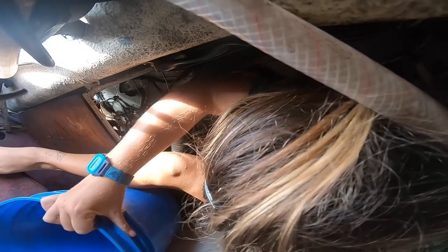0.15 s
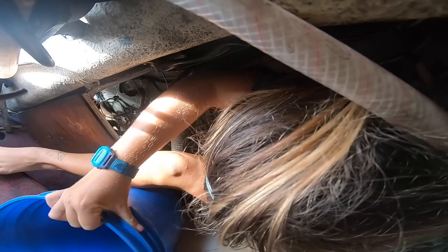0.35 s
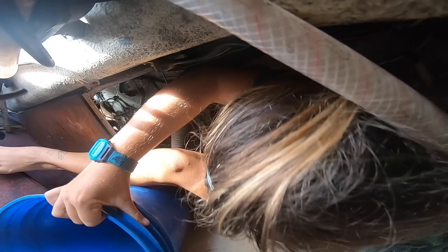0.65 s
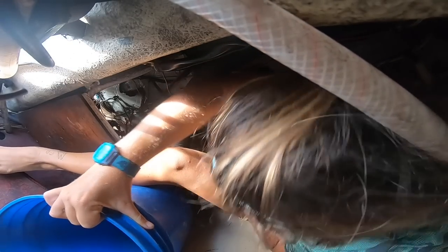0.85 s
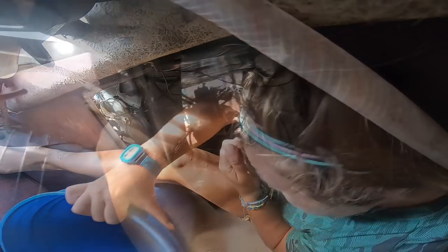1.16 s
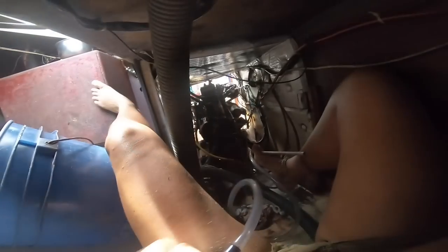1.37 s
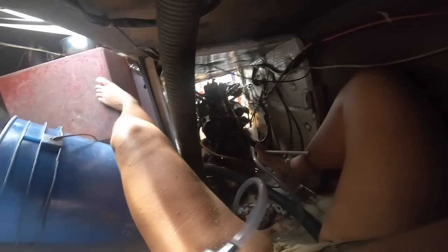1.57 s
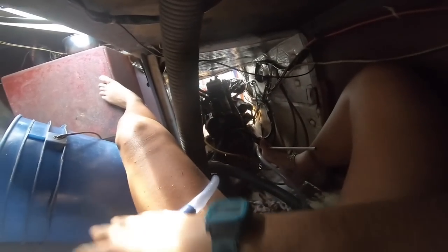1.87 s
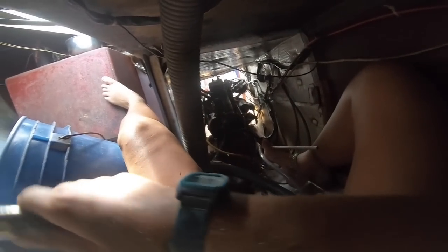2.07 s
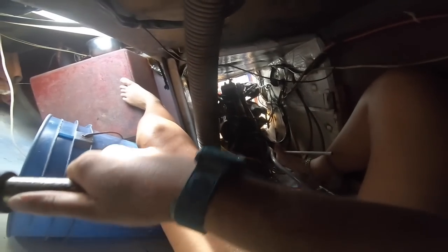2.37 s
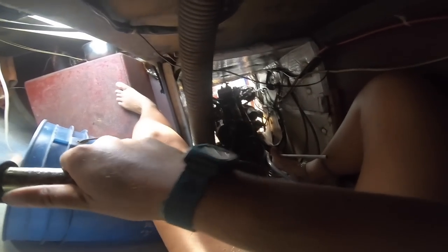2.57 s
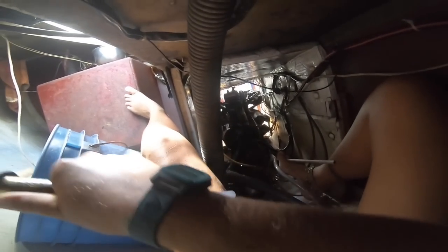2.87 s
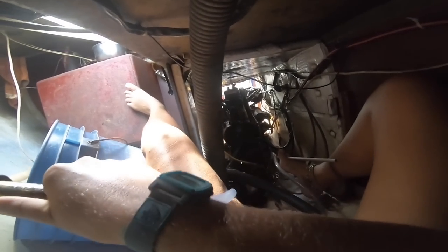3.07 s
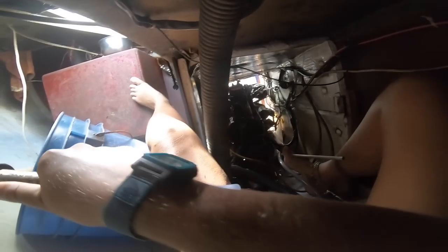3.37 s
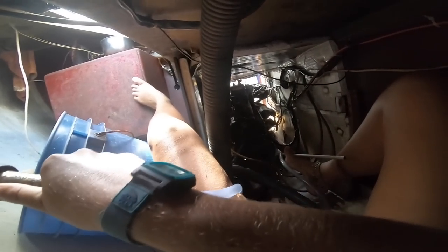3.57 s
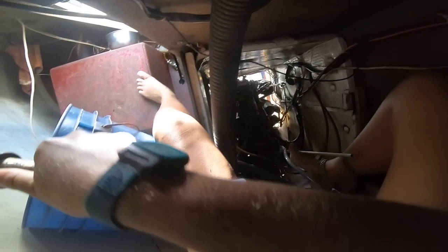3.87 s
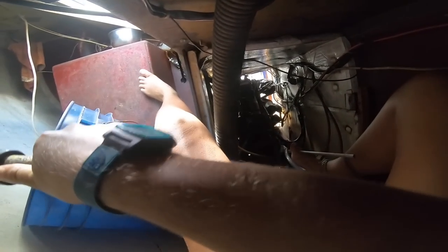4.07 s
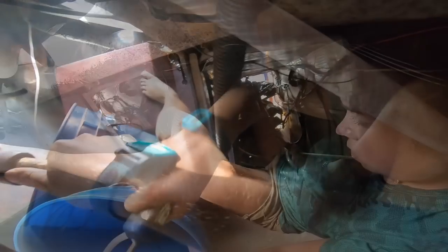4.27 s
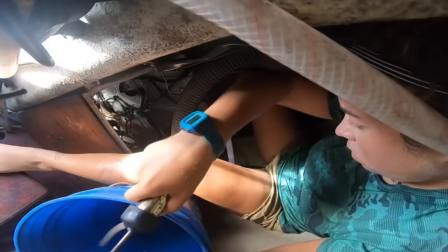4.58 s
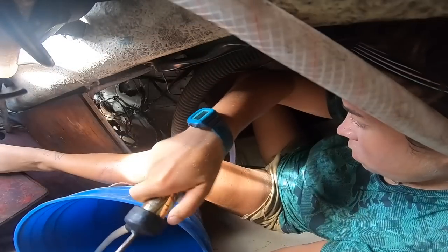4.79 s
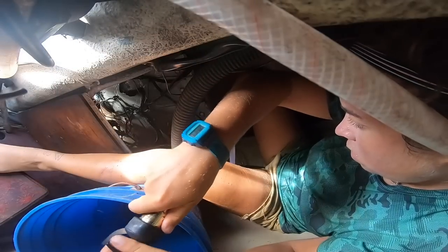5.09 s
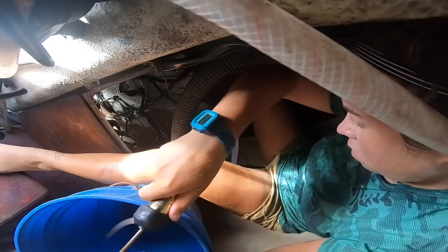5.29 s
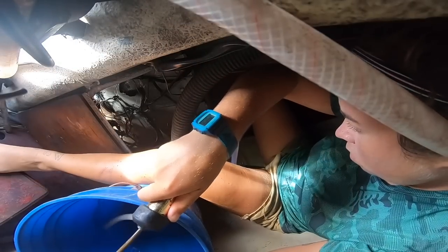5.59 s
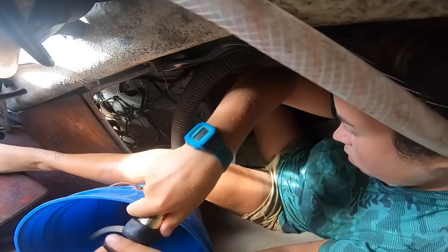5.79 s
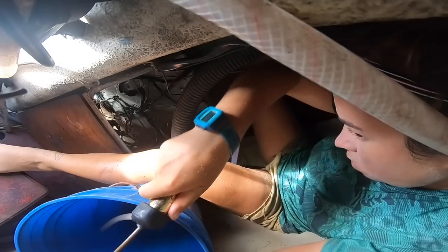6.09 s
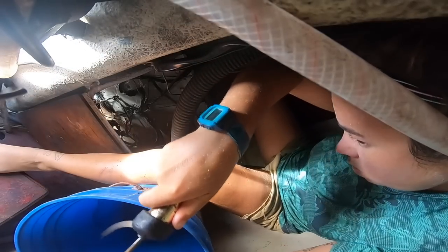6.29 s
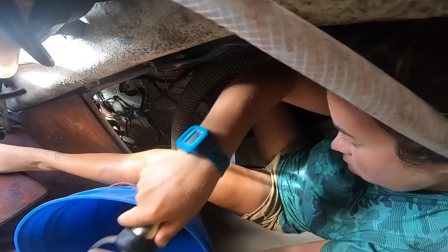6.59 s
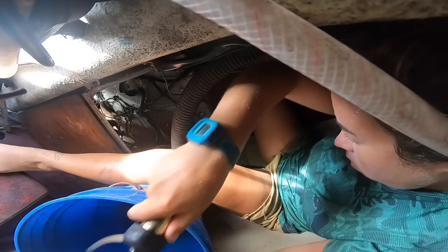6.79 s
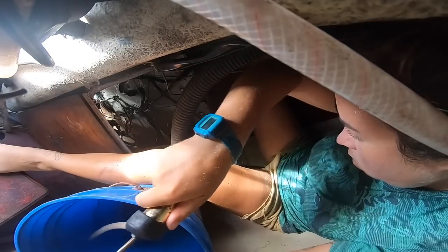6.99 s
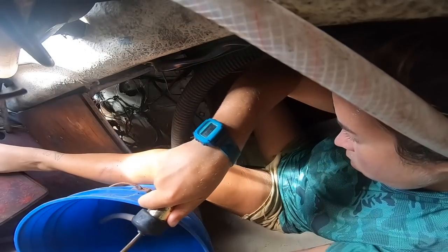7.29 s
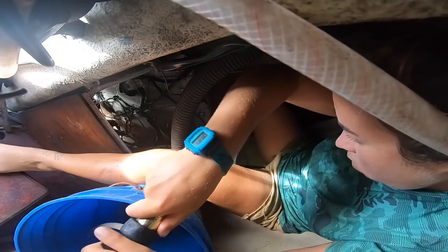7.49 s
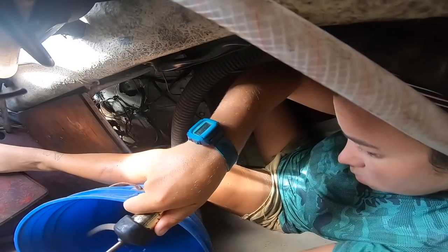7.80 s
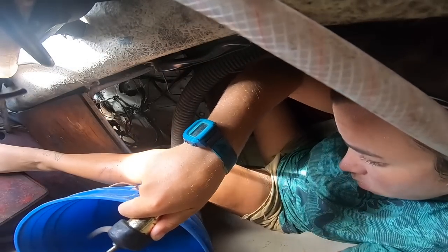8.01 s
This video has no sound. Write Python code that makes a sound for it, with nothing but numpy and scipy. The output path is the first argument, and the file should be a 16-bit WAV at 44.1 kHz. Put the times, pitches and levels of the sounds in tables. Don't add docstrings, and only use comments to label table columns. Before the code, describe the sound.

From 0 to about 1.2 seconds, low lumpy hand rumble leans to one side, with faint water slosh, small taps on a bucket rim and two very thin high whines that then drop away. From 1.3 to 4.2 it is drier and quiet: rumble continues, a very faint rub passes near 1.8, and a pump knocks the hollow plastic bucket around 2.3 and 2.9, with small clicks near 3.4 and 4.2. At about 4.3 water bursts in, far louder: a cluster of splats and squelching air until 4.7, sparser hits near 5 and 5.2, then dense irregular spurts from 5.5 to 8. Deep drumming thuds, crackling spray, brief plastic ringing, rising bubble plops and gurgles overlap, especially strong near 5.9, 6.6, 6.8 and 7.4. Running water swells between blows, with short close-wall reflections.

```python
import sys
import numpy as np
from scipy import signal
from scipy.fft import rfft, irfft, next_fast_len
from scipy.io import wavfile
from scipy.ndimage import uniform_filter1d

SR = 44100
rng = np.random.default_rng(int(sys.argv[2]) if len(sys.argv) > 2 else 0)


def ratio_of_db(decibels):
    return 10 ** (np.asarray(decibels, float) / 20)


def wrap_up_sound(samples):
    columns = np.atleast_2d(samples).T
    tamed = np.clip(columns, -1, 1)
    steps = np.round(tamed * 32767).astype(np.int16)
    wavfile.write(sys.argv[1], SR, steps)


N = 359360
TIME = np.arange(N) / SR
LEFT_RIGHT = np.array([[1], [-1]])

# start_s,
# peak_db, deep_share_db, length_s
SLUGS = [(0.225, -33.5, 4, 0.071), (0.951, -28.5, 2.5, 0.029), (4.351, -12, -17.5, 0.036),
         (4.46, -21.5, -25, 0.032), (4.552, -5.5, -10, 0.012), (4.652, -15, -1.5, 0.035),
         (4.979, -13, -24, 0.0076), (5.224, -15, 0.5, 0.031), (5.418, -25, 1, 0.069),
         (5.53, -13, -5, 0.0066), (5.595, -10.5, -9, 0.049), (5.651, -8, -6, 0.03),
         (5.748, -1, -14.5, 0.0062), (5.9, -13, -24.5, 0.01), (5.938, 2, -21.5, 0.017),
         (6.042, -12.5, -3, 0.12), (6.428, -20.5, -10, 0.0084), (6.498, -6, -8, 0.044),
         (6.551, -7, -8, 0.018), (6.608, -10.5, -16, 0.018), (6.74, -15.5, -14, 0.014),
         (6.787, -7, -7, 0.0075), (6.835, -18, -4.5, 0.016), (6.913, -11, -31, 0.007),
         (7.049, -22.5, -28, 0.031), (7.367, -6, -4.5, 0.04), (7.398, -1.5, -10.5, 0.011),
         (7.499, -8, -36, 0.0076), (7.543, -21, -33.5, 0.0087), (7.563, -17, -16, 0.0081),
         (7.606, -16.5, -20, 0.0077), (7.643, -17, -13, 0.016), (7.704, -9, -8, 0.03),
         (7.798, -14.5, -5.5, 0.032), (8.013, -35, 9, 0.041)]
# pitch_hz, width_hz, level_db
COLUMN_MODES = [(153.4, 11.5, 1.5), (172.4, 22.3, -0.5)]
# pitch_hz, width_hz, level_db
FLOOR_MODES = [(246, 84.3, -3), (276, 22.9, 4), (332.7, 12.7, -12)]
# start_s, spray_peak_db, share_above_5500_hz_db, t60_s, rise_s
SPLATS = [(4.331, -31, -25, 0.27, 0.0014), (4.349, -11.5, -13.5, 0.13, 0.0038),
          (4.465, -40, -40, 0.082, .002), (4.552, -11.5, -8, 0.15, 0.0046),
          (4.659, -25.5, -5, 0.31, 0.0064), (4.978, -11, 2, 0.1, 0.00091), (5.233, -27, -14, 0.4, 0.0018),
          (5.418, -31, 1, 0.31, 0.016), (5.549, -20.5, -36, 0.14, 0.0024), (5.612, -21, -27, 0.14, 0.0036),
          (5.645, -25, 0, 0.43, 0.012), (5.785, -10.5, -1.5, 0.085, 0.0028), (5.937, -10, -7, 0.11, 0.0069),
          (6.064, -14.5, -20, 0.17, 0.0068), (6.135, -28, -28, 0.22, 0.0073),
          (6.431, -39.5, 8.5, 0.079, 0.0015), (6.48, -26, -5.5, 0.3, 0.033),
          (6.598, -6, -19, 0.092, 0.0035), (6.676, -21, -27, 0.07, 0.0023), (6.786, -9, -11, 0.13, 0.002),
          (6.885, -30.5, -28, 0.25, 0.0066), (6.948, -18.5, -23, 0.29, 0.0022),
          (6.998, -30.5, -1, 0.61, 0.0041), (7.11, -26, -7.5, 0.099, 0.01), (7.372, -21, -13, 0.27, 0.006),
          (7.475, -15.5, -12.5, 0.096, 0.002), (7.638, -26.5, -26, 0.25, 0.0036),
          (7.706, -28.5, -29, 0.49, 0.033), (7.805, -21.5, -17, 0.13, 0.0022),
          (8.02, -20.5, -3.5, 0.24, 0.0036), (8.123, -20, -10, 0.058, 0.0018)]
# pitch_hz, level_db, t60_s
RIM_MODES = [(2165, -5, 0.07), (2840, -4.5, 0.052), (3060, -6, 0.057), (3450, -1.5, 0.11),
             (3524, -3, 0.094), (3960, -21, 0.068), (4700, -8, 0.05), (7760, -5, 0.054)]
# pitch_hz, level_db (per Hz)
SPRAY_COLOUR = [(1500, 5.5), (2200, -1), (3500, 4), (5200, -5), (7600, 4), (10000, -3), (12500, -28),
                (15800, -44)]
# start_s, peak_db, bubble_pitch_hz, t60_s
PLOPS = [(4.336, -30.5, 615, 0.1), (4.349, -18.5, 601, 0.25), (4.466, -22.5, 1410, 0.075),
         (4.559, -14.5, 912.6, 0.14), (4.663, -20, 1065, 0.1), (4.815, -27.5, 664, 0.52),
         (4.977, -23, 1420, 0.11), (5.186, -30, 1412, 0.0596), (5.228, -26.5, 1379, 0.27),
         (5.427, -23.5, 1035, 0.13), (5.617, -25.5, 1145, 0.258), (5.655, -17.5, 945, 0.2),
         (5.739, -25, 1371, 0.4), (5.792, -18, 896, 0.0626), (5.945, -11.5, 1027, 0.14),
         (6.048, -17, 1032, 0.6), (6.147, -20.5, 1038, 0.15), (6.315, -27, 640, 0.119),
         (6.431, -23.5, 628, 0.27), (6.507, -26.5, 1327, 0.31), (6.598, -23, 974, 0.1962),
         (6.785, -12, 610, 0.15), (6.918, -17, 1020, 0.19), (7.121, -23.5, 587, 0.1102),
         (7.209, -29, 1420, 0.1048), (7.38, -20.5, 972, 0.1452), (7.4, -17, 860, 0.17),
         (7.479, -30, 1829, 0.28), (7.653, -25.5, 1371, 0.095), (7.709, -20.5, 1036, 0.17),
         (7.812, -22, 1028, 0.11)]
# pitch_hz, width_hz, level_db
LOWER_WALL = [(429, 12, 1.5), (598.4, 11, 1.5), (768.5, 7.5, 4.5), (849, 31, -6), (950.5, 39, -4),
              (1041, 75, -10.5)]
# pitch_hz, width_hz, level_db
UPPER_WALL = [(1290, 72, -3), (1352, 42, 1.5), (1630, 90, -7), (1822, 54, -8), (1660, 480, -8)]
# start_s, length_s, start_pitch_hz, end_pitch_hz, level_db
SQUELCHES = [(4.413, 0.043, 909, 967, -27.5), (4.66, 0.039, 1000, 1250, -28),
             (4.679, 0.027, 1293, 1720, -34), (5.602, 0.076, 1483, 2440, -36.5),
             (5.734, 0.048, 1700, 2200, -39), (6.884, .025, 1970, 2320, -37), (6.912, 0.02, 842, 1260, -28),
             (6.916, 0.022, 3340, 3500, -38), (6.93, .035, 2080, 2360, -49),
             (6.948, 0.0333, 2805, 3210, -40), (6.988, 0.036, 3200, 3710, -39),
             (6.915, 0.064, 1290, 1386, -27), (6.926, 0.054, 590, 630, -29)]
# start_s, pitch_hz, level_db, t60_s
RINGS = [(4.355, 1344, -30, 0.18), (4.371, 1790, -27.5, 0.17), (4.376, 1200, -30, 0.13),
         (4.463, 1380, -33, 0.14), (4.465, 2670, -37, .06), (4.465, 3290, -26.5, 0.046),
         (4.465, 3790, -36, 0.066), (4.554, 1310, -23, 0.11), (4.556, 2970, -23, 0.069),
         (4.557, 3360, -24, 0.095), (4.558, 2236, -24, 0.1), (4.57, 983, -20, 0.097),
         (4.663, 3000, -22, 0.04), (4.66, 3381, -36, 0.17), (4.66, 4700, -35, 0.075),
         (4.676, 1355, -16, 0.076), (4.684, 1764, -28.5, 0.096), (5.551, 3430, -24, 0.032),
         (5.551, 4400, -23.5, 0.04), (5.613, 3980, -34, 0.044), (5.654, 1004, -24, 0.23),
         (5.66, 1490, -36, 0.15), (5.69, 1640, -38, .08), (5.736, 1370, -35, 0.14),
         (5.745, 3300, -34.5, 0.079), (5.945, 3300, -34, .09), (5.944, 1717, -19, 0.089),
         (5.961, 1710, -26, 0.1), (6.043, 1610, -31, 0.053), (6.067, 1358, -27, 0.38),
         (6.068, 3340, -40, 0.052), (6.142, 990, -24, 0.058), (6.15, 1735, -38, 0.063),
         (6.164, 1333, -29, 0.14), (6.499, 1340, -37, 0.44), (6.605, 1357, -21, 0.3),
         (6.79, 2144, -18.5, 0.081), (6.795, 3461, -31, 0.12), (6.916, 982, -29, 0.093),
         (6.95, 794, -27, 0.1), (6.949, 3120, -31, 0.087), (7.004, 1360, -41, 0.063),
         (7.254, 1316, -26.5, 0.049), (7.328, 1360, -31.5, 0.15), (7.41, 784, -40, 0.13),
         (7.481, 1923, -31.5, 0.084), (7.708, 2310, -31, 0.089), (7.809, 989, -29, 0.083),
         (7.812, 2340, -33, 0.059), (7.95, 2680, -37, 0.053)]
# start_s, peak_db, t60_s
TICKS = [(3.372, -79, .04), (4.789, -35, 0.11), (5.067, -40.5, 0.06), (6.017, -42, .08),
         (6.352, -36, 0.083), (6.509, -35.5, .08), (7.055, -33, 0.12), (7.085, -36, 0.12), (7.12, -36, .08),
         (7.209, -34.5, .1), (7.38, -25, 0.074), (7.742, -43, 0.17), (7.951, -32.5, 0.23)]
# pitch_hz, level_db (per Hz)
TICK_COLOUR = [(5000, -21), (7600, 7), (10000, -4), (13000, -6), (16000, -16)]
# middle_s, length_s, level_db, spray_share_db
GUSHES = [(0.147, 0.9, -47.5, -7.5), (0.526, 0.068, -58, 23), (1.172, 0.16, -58.5, 3),
          (1.78, 0.398, -64, -23), (2.494, 0.093, -53.5, -5), (3.348, 0.33, -65, 12),
          (3.657, 0.36, -68.5, 12), (4.135, 0.3394, -57.5, 3.5), (4.613, 0.51, -43.5, -5),
          (4.86, 0.51, -46.5, 6.5), (5.642, 0.63, -42.5, 4), (6.09, 0.4, -46.5, 4),
          (6.462, 0.82, -47.5, 4.5), (6.64, .25, -40, -10), (6.899, 0.6, -40, -5), (6.947, 0.14, -36, -9),
          (7.343, 0.56, -38.5, -2.5), (8.125, 0.79, -39, 2.5)]
# pitch_hz, level_db (per Hz)
WASH_COLOUR = [(500, -5), (900, 1.5), (1350, 1), (2200, -9.5), (3400, -14.5), (5000, -24.5)]
# start_s, thud_db, ring_db, ring_pitch_hz, tick_db
KNOCKS = [(0.036, -57, -32, 526, -52), (0.209, -61, -34.5, 1473, -29), (0.506, -45, -38, 1647, -26),
          (1.685, -64.5, -47, 1525, -48), (2.258, -18, -33, 1334, -57), (2.853, -22.5, -30.5, 743, -48),
          (3.242, -41, -46, 540, -68), (3.373, -52, -51.5, 1810, -33.5), (3.418, -30.5, -42.5, 2035, -20.5),
          (4.102, -54.5, -68, 1870, -29.5), (4.18, -32, -35, 2000, -14.5)]
# start_s, pitch_hz, level_db, t60_s
KNOCK_RINGS = [(.036, 558, -30, 0.089), (0.037, 1390, -36, .09), (0.037, 2980, -46.5, .04),
               (2.856, 907, -40, .09), (2.262, 790, -40.5, 0.069), (2.262, 920, -34, 0.099),
               (2.262, 1510, -52, 0.067), (2.288, 790, -34, 0.088), (2.288, 940, -41, .06),
               (2.315, 835, -45, .08), (2.865, 1305, -46, 0.073), (3.242, 550, -42, .1)]
# start_s, slosh_db, trickle_db, spray_db, hand_rumble_db
SHOTS = [
    (0.0, -38, -52.5, -57, -65),
    (1.29, -49.5, -70.5, -124, -49),
    (4.25, -41, -52.5, -48.5, -60.5),
]
# start_s (of the peak), peak_db, rise_s, fall_s (both over 30 dB)
JOLTS = [(0.0, -23.5, 0.032, 0.11), (0.251, -20, 0.15, 0.16), (0.481, -18, 0.17, 0.32),
         (0.92, -42, 0.42, 0.28), (1.246, -22, 0.11, 0.11), (2.08, -32, 1.47, 0.33), (2.27, -32, 0.31, 3.4),
         (2.95, -31, 1.1, 0.2), (3.167, -27.5, 0.13, 0.13), (3.452, -23.5, 0.39, 0.09),
         (3.7, -29.5, 0.32, 0.23), (3.95, -29.5, 0.14, 0.16), (4.201, -22.5, 0.15, 0.19),
         (4.561, -26, 0.041, 0.23), (5.24, -24.5, 0.019, 0.31), (5.316, -18.5, 0.088, 0.13),
         (5.6, -28.5, 0.047, 0.52), (6.0, -22, 0.058, 0.28), (6.539, -33.5, 0.048, 0.42),
         (6.85, -31, 0.14, 0.11), (7.421, -29.5, 0.11, 0.17), (8.008, -41, 0.098, 0.17)]
# start_s, left_right_db
GRIP = [(0.0, -5), (0.27, -6), (0.38, -12.5), (1.43, 0.5), (2.68, -18.5), (4.34, -17), (4.49, 3),
        (5.47, -15), (5.74, -1), (8.15, -11)]
# pitch_hz, level_db (per Hz)
RUMBLE_COLOUR = [(16, -1.5), (30, -2.5), (48, 2.5), (75, -10), (110, -9.5), (150, -31)]
# pitch_hz, level_db (per Hz)
AIR_COLOUR = [(140, -3), (261, -5.5), (464, -8.5), (993, -27.5), (2500, -36), (3600, -30), (6000, -34),
              (15000, -59)]
# pitch_hz, width_hz, level_db
WHINES = [
    (5420, 14, -79),
    (7120, 20, -73),
]
# middle_s, half_length_s, pitch_hz, level_db
HOSE_RUB = (1.78, 0.25, 2530, -74)
# pitch_hz, likeness (-1 to 1)
LIKENESS = [(60, 0.5), (150, 0.98), (350, 0.97), (550, 0.45), (1500, 0.1), (3000, 0.45), (6000, 0.25),
            (15000, -0.2)]
# pitch_hz, left_right_db
TILT = [(60, 0.5), (160, 2.5), (280, -4), (550, -2), (1650, 0), (4970, -1), (15000, 6.5)]

PUMPING_S = SHOTS[-1][0]
KNOCK_DEEP_DB, KNOCK_HOLD_S, KNOCK_RING_S = -38, 0.043, 0.12
KNOCK_BRIGHT_DB, KNOCK_TICK_S, KNOCK_TICK_RISE_S = -31, 0.095, 0.0008
KNOCK_DAMP_DB = 9
KNOCK_BODY_DB, KNOCK_BODY_S = -11, 0.17
TOP_HISS_DB, CALM_PATCHY_DB, PUMPING_PATCHY_DB = -19, 1.2, 3.5
UPPER_WALL_DB, UPPER_DB_PER_OCTAVE = -5, 5
BASE_DB, BASE_DB_PER_OCTAVE = -16.5, 5.5
PLOP_RISE_S, PLOP_HOLD_S, DRY_GURGLE_DB = 0.0035, 0.016, -20
RING_RISE_S = 0.0024
WASH_DB, FIZZ_DB, STIR_DB = -3.5, -5, -17
SLOSH_SHARE_DB, FADE_S = 8.5, 0.0932
SPACE_DB, SPACE_T60_S = -11, 0.3
AIR_DB, HOLLOW_DEPTH = -53, 0.7
WHINE_DROP_S = 1.27
PORT_HZ, PORT_LIFT, CUTOFF_HZ = 7800, 0.5, 16300


def slugs(slosh_db):
    thuds = [(s, thud_db, KNOCK_DEEP_DB, KNOCK_HOLD_S) for s, thud_db, *_ in KNOCKS]
    s, peak_db, deep_db, length = np.transpose(SLUGS + thuds)
    hold = np.clip(length, 0.002, 0.15)
    slosh = ratio_of_db(slosh_db - 5.5)
    deep = bursts(s - 0.004, ratio_of_db(peak_db + deep_db - 3), 0.0048, hold, np.full(len(s), 0.3))
    drum = bursts(s - 0.004, ratio_of_db(peak_db - 9.5), 0.0082, hold, np.full(len(s), 0.105))
    column = resonate(grainy(7.1, 41.6), COLUMN_MODES, wander_db=3)
    column = evened(band(column, 123, 240), size=1500)
    floor = resonate(grainy(1, 105), FLOOR_MODES, wander_db=-1)
    floor = evened(band(floor, 199, 412), size=900)
    return column * np.hypot(deep, slosh) + floor * np.hypot(drum, slosh * ratio_of_db(-2.5))


def splats(spray_db):
    knocks = [(k[0], k[4], KNOCK_BRIGHT_DB, KNOCK_TICK_S, KNOCK_TICK_RISE_S) for k in KNOCKS]
    s, peak_db, bright_db, t60, rise = np.transpose(SPLATS + knocks)
    levels = ratio_of_db(np.stack([peak_db - 14, peak_db + bright_db - 7.5], 1))
    blows = bursts(s, levels, np.maximum(rise, 3e-4), rise + 0.0011, np.clip(t60, 0.06, 0.26))
    sputter = ratio_of_db(spray_db - 9) * flicker(0.13, 1.1)
    dull, bright = np.hypot(blows, sputter)

    calm = np.arange(N // 40 + 2) * 40 < PUMPING_S * SR
    patchy = np.where(calm, CALM_PATCHY_DB, PUMPING_PATCHY_DB)
    crackle = flicker(0.7 * patchy, 250)
    hiss = banded(rng.standard_normal((2, 2, N)) * crackle, SPRAY_COLOUR, patchy_db=patchy, rate=28.5)
    spray = hiss + ratio_of_db(-6) * droplets(500, 2300, 9500, cycles=45)
    low = signal.sosfilt(signal.butter(2, 5500, fs=SR, output="sos"), spray)
    high = signal.sosfilt(signal.butter(2, 5500, "high", fs=SR, output="sos"), spray)
    top_hiss = ratio_of_db(spray_db + TOP_HISS_DB) * rms_one(band(rng.standard_normal((2, N)), 13800, 19500))
    return dull * low - bright * high + rim(s, peak_db) + top_hiss


def rim(s, peak_db):
    out, shares = 0, rng.normal(0, 4, size=(len(s), len(RIM_MODES), 2))
    damp_db = KNOCK_DAMP_DB * (s < PUMPING_S)
    for k, (hz, level_db, t60) in enumerate(RIM_MODES):
        clicks = np.zeros((2, N))
        click_db = peak_db + level_db - 24 - damp_db + shares[:, k, 0]
        clicks[:, (s * SR).astype(int)] = ratio_of_db(click_db + 1.7 * shares[:, k, 1] * LEFT_RIGHT)
        out = out + ring(clicks, hz, t60)
    return out


def plops(trickle_db):
    knocks = [(s, ring_db, hz, KNOCK_RING_S) for s, _, ring_db, hz, _ in KNOCKS]
    s, peak_db, hz, t60 = np.transpose(PLOPS + knocks)
    octaves = np.log2(hz / 1000)
    upper_db = UPPER_WALL_DB + UPPER_DB_PER_OCTAVE * octaves
    base_db = BASE_DB - BASE_DB_PER_OCTAVE * octaves
    t60 = np.clip(t60, 0.04, 0.3)
    levels = ratio_of_db(np.stack([peak_db - 10, peak_db + upper_db - 6.5, peak_db + base_db], 1))
    lower, upper, base = bursts(s - 0.002, levels, PLOP_RISE_S, np.full(len(s), PLOP_HOLD_S), t60)

    trickle = ratio_of_db(trickle_db - 2.5)
    wall = evened(resonate(grainy(2.1, 96), LOWER_WALL, wander_db=4.5), size=1300)
    walls = band(wall, 325, 700) * np.hypot(base, trickle)
    walls += band(wall, 843, 2180) * np.hypot(lower, trickle)
    top = evened(resonate(grainy(5.1, 29), UPPER_WALL, wander_db=7), size=1300)
    walls += top * np.hypot(upper, ratio_of_db(trickle_db - 5.5))

    bubbles, t = np.zeros(2 * N), TIME[:SR // 3]
    climbs = rng.uniform(0.029, 1.65, len(s))
    for at, level_db, f, ring_s, climb in zip((s * SR).astype(int), peak_db, hz, t60, climbs):
        shape = np.minimum(t / 0.0007, 1) * ratio_of_db(level_db - 6 - 60 * t / (0.64 * ring_s))
        bubbles[at:at + len(t)] += shape * np.sin(2 * np.pi * f * (t + climb * t * t / 2))
    churn = np.hypot(np.hypot(lower, upper), ratio_of_db(trickle_db + 3.5))
    churn = churn * ratio_of_db(-1 + DRY_GURGLE_DB * (TIME < PUMPING_S))
    return walls + bubbles[:N] * ratio_of_db(-0.4 * LEFT_RIGHT) + gurgle(churn, 659.8, 3610, cycles=57)


def gurgle(churn, low_hz, high_hz, cycles, count=1200):
    out, t = np.zeros((2, 2 * N)), TIME[:SR // 20]
    busy = np.cumsum(churn ** 0.61)
    for when, pitch, size, climb, side in rng.random((count, 5)):
        at = np.searchsorted(busy, when * busy[-1])
        hz = low_hz * (high_hz / low_hz) ** (pitch * pitch)
        shape = np.minimum(t / 0.0065, 1) * ratio_of_db(-16 * size - 60 * t * hz / cycles)
        tone = shape * np.sin(2 * np.pi * hz * (t + 6.53 * climb * t * t))
        out[:, at:at + len(t)] += churn[at] * tone * ratio_of_db(2 * (side - 1) * LEFT_RIGHT)
    return out[:, :N]


def squelches():
    out, flutter = np.zeros(N), flicker(4, 70)
    for s, length, start_hz, end_hz, level_db in SQUELCHES:
        at, t = int(s * SR), TIME[:int(length * SR)]
        turns = start_hz * t + (end_hz - start_hz) * t * t / (2 * length)
        swell = np.sqrt(np.sin(np.pi * t / length))
        out[at:at + len(t)] += ratio_of_db(level_db) * swell * np.sin(2 * np.pi * turns)
    return out * flutter


def rings():
    out, t = np.zeros(2 * N), TIME[:SR // 3]
    unsteady = np.tile(flicker(5, 55), 2)
    caught = RINGS + KNOCK_RINGS
    for (s, hz, level_db, t60), skip in zip(caught, rng.integers(0, N, len(caught))):
        at = int(s * SR)
        shape = np.minimum(t / RING_RISE_S, 1) * ratio_of_db(level_db - 60 * t / max(t60, 0.03))
        out[at:at + len(t)] += shape * unsteady[skip:skip + len(t)] * np.sin(2 * np.pi * hz * t)
    return out[:N]


def ticks():
    s, peak_db, t60 = np.transpose(TICKS)
    hold = np.full(len(s), 0.004)
    shape = bursts(s - 0.002, ratio_of_db(peak_db - 6.5), 0.0016, hold, np.clip(t60, 0.03, 0.2))
    return shape * banded(rng.standard_normal((2, 2, N)), TICK_COLOUR, patchy_db=-0.5, rate=32)


def wash(trickle_db):
    noise = banded(rng.standard_normal((2, 2, N)), WASH_COLOUR, patchy_db=4.5, rate=11)
    s, peak_db, *_ = np.transpose(SPLATS)
    stirred = bursts(s, ratio_of_db(peak_db + STIR_DB), 0.01, np.full(len(s), 0.03), np.full(len(s), 0.2))
    fizz = np.hypot(ratio_of_db(trickle_db + FIZZ_DB) * (TIME > PUMPING_S), stirred) + 1e-9
    return ratio_of_db(trickle_db + WASH_DB) * noise + gurgle(fizz, 1440, 4660, cycles=26, count=900)


def running_water(slosh_db, trickle_db, spray_db):
    power = ratio_of_db(2 * np.array([slosh_db, trickle_db, spray_db]))
    for s, length, level_db, spray_share_db in GUSHES:
        span = slice(max(int((s - length / 2) * SR), 0), int((s + length / 2) * SR))
        swell = np.cos(np.pi * (TIME[span] - s) / length) ** 4
        shares_db = np.array([[SLOSH_SHARE_DB], [0], [spray_share_db]])
        power[:, span] += swell * ratio_of_db(2 * (level_db + shares_db))
    return 10 * np.log10(power)


def knock_body():
    s, _, ring_db, *_ = np.transpose(KNOCKS)
    hold, t60 = np.full(len(s), 0.02), np.full(len(s), KNOCK_BODY_S)
    shape = bursts(s, ratio_of_db(ring_db + KNOCK_BODY_DB), 0.0077, hold, t60)
    return shape * rms_one(band(rng.standard_normal(N), 350, 1650, order=3))


def handling(rest_db):
    jolts = 0
    for s, db, rise, fall in JOLTS:
        away = np.maximum((s - TIME) / rise, (TIME - s) / fall)
        jolts = jolts + ratio_of_db(2 * db - 60 * away)
    pan_db, = in_time(GRIP)
    lumps = banded(rng.standard_normal((2, 2, N)), RUMBLE_COLOUR, patchy_db=6, rate=2.5)
    steady = lumps / np.sqrt(uniform_filter1d(lumps ** 2, size=3500) + 0.0085)
    return steady * np.sqrt(jolts + ratio_of_db(2 * rest_db)) * ratio_of_db(pan_db / 2 * LEFT_RIGHT)


def space(x):
    size = next_fast_len(N + SR // 2)
    hz, out = np.arange(size // 2 + 1) * SR / size, []
    for side, lags in zip(x, rng.uniform(0.0067, 0.024, (2, 6))):
        echoes = 0
        for lag in lags:
            loss = ratio_of_db(-60 * lag / SPACE_T60_S * (1.5 + hz / 7000))
            loop = loss * np.exp(-2j * np.pi * hz * lag)
            echoes = echoes + loop / (1 - loop)
        out.append(irfft(rfft(side, size) * echoes, size)[:N])
    return np.array(out)


def background():
    air = ratio_of_db(AIR_DB) * banded(rng.standard_normal((2, 2, N)), AIR_COLOUR, patchy_db=1.5, rate=8)
    air = air - HOLLOW_DEPTH * band(air, 2700, 4900, order=1)
    s, length, hz, level_db = HOSE_RUB
    stroke = ratio_of_db(level_db) * np.exp(-((TIME - s) / length) ** 2)
    rub = stroke * narrow_noise(hz, 110)
    whine = sum(ratio_of_db(db) * narrow_noise(hz, width) for hz, width, db in WHINES)
    return air + rub + whine * np.clip((WHINE_DROP_S - TIME) / 0.072, 0.12, 1)


def narrow_noise(hz, width):
    return rms_one(band(rng.standard_normal((2, N)), hz - width, hz + width, order=2))


def droplets(per_s, low_hz, high_hz, cycles, count=10):
    sizes = ratio_of_db(2 * np.minimum(rng.exponential(1, N), 4.5)) * (rng.random(N) < per_s / SR)
    out, dealt, pans = 0, rng.integers(0, count, N), rng.normal(0, 3, count)
    for k, hz in enumerate(np.geomspace(low_hz, high_hz, count)):
        level = ratio_of_db(at_hz(SPRAY_COLOUR, hz) + pans[k] * LEFT_RIGHT)
        out = out + ring(sizes * (dealt == k), hz, cycles / hz) * level
    return rms_one(out)


def resonate(force, modes, wander_db):
    out, power = 0, 0
    for k, (hz, width, level_db) in enumerate(modes):
        r, w = np.exp(-np.pi * width / SR), 2 * np.pi * hz / SR
        push = force * (ratio_of_db(level_db) * flicker(wander_db, 7.4))
        poles = [1, -2 * r * np.cos(w), r * r]
        mid, side = signal.lfilter([1, 0, -1], poles, push) * (1 - r * r) / 2
        out = out + (-1) ** k * spread(mid, side, hz)
        power = power + ratio_of_db(2 * level_db) * np.pi * width / SR
    return out / np.sqrt(power)


def ring(force, hz, t60):
    r, w = ratio_of_db(-60 / (t60 * SR)), 2 * np.pi * hz / SR
    return signal.lfilter([0, np.sin(w)], [1, -2 * r * np.cos(w), r * r], force + 1e-18)


def bursts(times, levels, rises, holds, t60s):
    out = np.zeros(np.shape(levels)[1:] + (N,))
    rises = np.broadcast_to(rises, len(times))
    for s, level, rise, hold, t60 in zip(times, levels, rises, holds, t60s):
        i = int(s * SR)
        t = np.arange(min(N - i, int((hold + t60) * SR))) / SR
        shape = np.minimum(t / rise, 1) * ratio_of_db(-60 * np.maximum(t - hold, 0) / t60)
        out[..., i:i + len(t)] += (np.asarray(level)[..., None] * shape) ** 2
    return np.sqrt(out)


def banded(white, spectrum, patchy_db, rate):
    out, low_hz, top_hz = 0, spectrum[0][0], min(spectrum[-1][0], 0.45 * SR)
    edges = np.geomspace(low_hz, top_hz, int(2 * np.log2(top_hz / low_hz)) + 2)
    for k, (low, high) in enumerate(zip(edges, edges[1:])):
        mid, side = band(white[k % 2], low, high, order=2)
        hz = np.sqrt(low * high)
        out = out + ratio_of_db(at_hz(spectrum, hz)) * flicker(patchy_db, rate) * spread(mid, side, hz)
    return rms_one(out)


def grainy(grain_db, rate):
    return rng.standard_normal((2, N)) * flicker(grain_db, rate)


def flicker(spread_db, rate):
    r = np.exp(-80 * np.pi * rate / SR)
    white = rng.standard_normal(N // 40 + 2002)
    slow = signal.lfilter([1], [1, -2 * r, r * r], white)[2000:]
    return np.interp(TIME * SR / 40, np.arange(len(slow)), ratio_of_db(spread_db * rms_one(slow)))


def spread(mid, side, hz):
    alike = np.clip(at_hz(LIKENESS, hz), -1, 1)
    pair = np.sqrt(1 + alike) * mid + np.sqrt(1 - alike) * side * LEFT_RIGHT
    return pair * ratio_of_db(at_hz(TILT, hz) / 2 * LEFT_RIGHT)


def band(x, low_hz, high_hz, order=4):
    return signal.sosfilt(signal.butter(order, [low_hz, high_hz], "band", fs=SR, output="sos"), x)


def evened(x, size):
    swells = uniform_filter1d(np.mean(x ** 2, 0), size=size)
    return x / np.sqrt(swells + 0.19 * np.mean(x ** 2))


def rms_one(x):
    return x / np.sqrt(np.mean(x ** 2) + 1e-20)


def at_hz(points, hz):
    pitches, values = np.transpose(points)
    return np.interp(np.log(hz), np.log(pitches), values)


def in_time(rows):
    s, *columns = np.transpose(rows)
    return [np.interp(TIME, s, c) for c in columns]


def in_shots():
    starts = [(s + FADE_S / 2, *levels) for s, *levels in SHOTS]
    ends = [(later[0] - FADE_S / 2, *row[1:]) for row, later in zip(SHOTS, SHOTS[1:])]
    return in_time(sorted(ends + starts))


def scene():
    *water_db, hand_db = in_shots()
    slosh_db, trickle_db, spray_db = running_water(*water_db)
    bucket = slugs(slosh_db) + splats(spray_db) + plops(trickle_db) + squelches() + rings()
    bucket = bucket + ticks() + wash(trickle_db) + knock_body()
    walls = ratio_of_db(SPACE_DB) * space(band(bucket, 500, 18000, order=2))
    return bucket + walls + handling(hand_db) + background()


def low_pass(x):
    return signal.sosfilt(signal.butter(12, 16130, fs=SR, output="sos"), x)


def record(dry):
    lifted = dry + PORT_LIFT * band(dry, PORT_HZ - 500, PORT_HZ + 500, order=1)
    rounded = 1.55 * np.tanh(lifted / 1.7)
    steep = signal.cheby2(10, 60, CUTOFF_HZ, fs=SR, output="sos")
    return low_pass(signal.sosfilt(steep, rounded))


dry = scene()
out = record(dry)
wrap_up_sound(out)
```